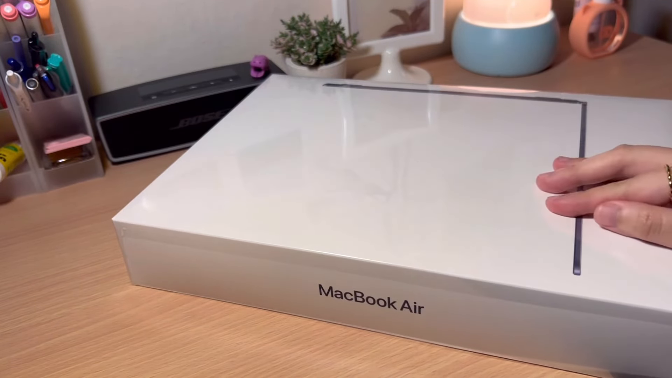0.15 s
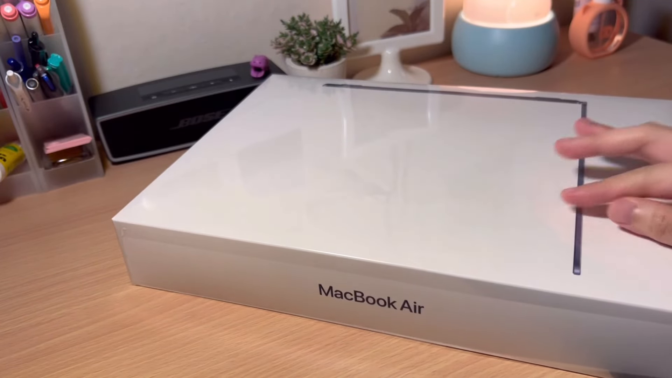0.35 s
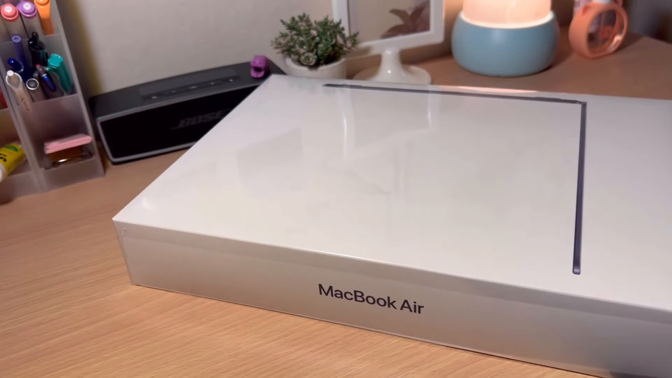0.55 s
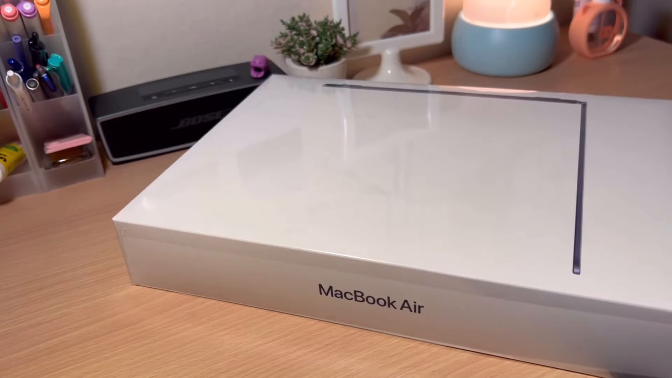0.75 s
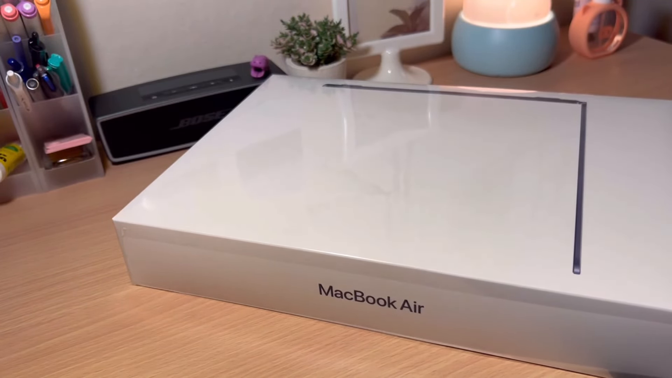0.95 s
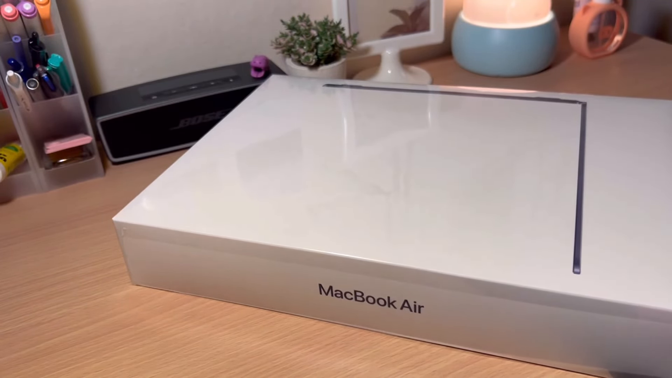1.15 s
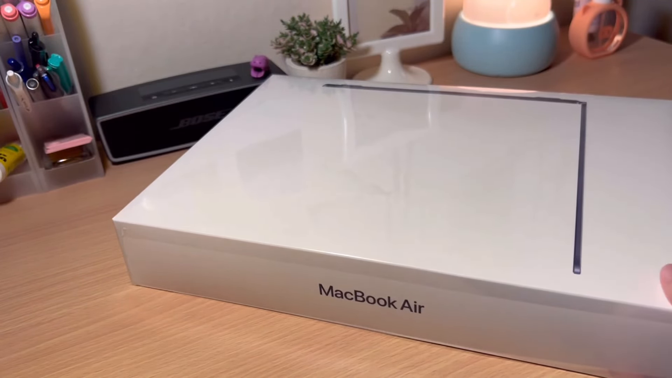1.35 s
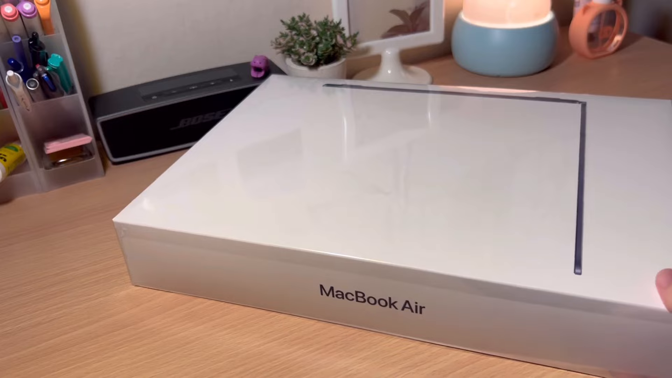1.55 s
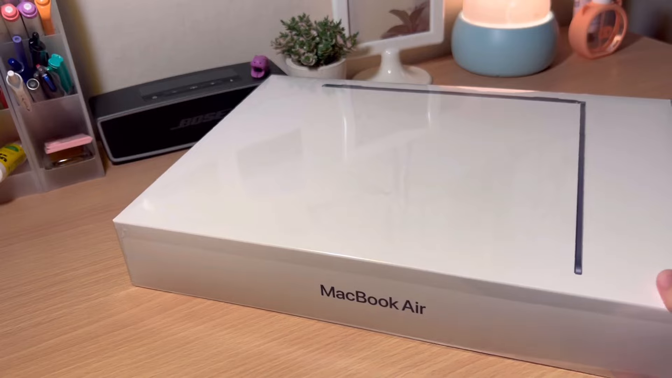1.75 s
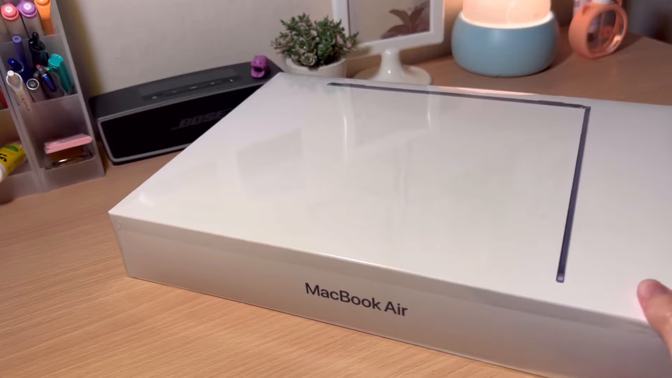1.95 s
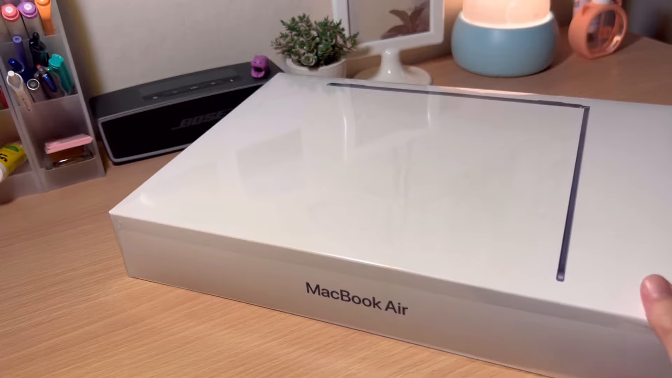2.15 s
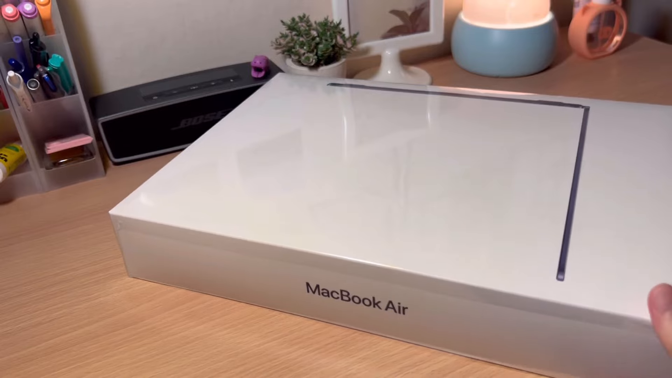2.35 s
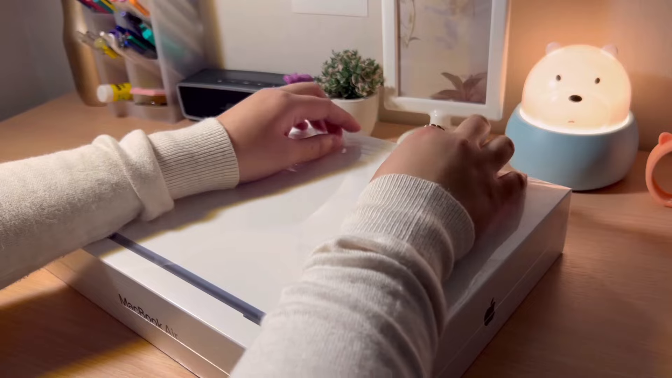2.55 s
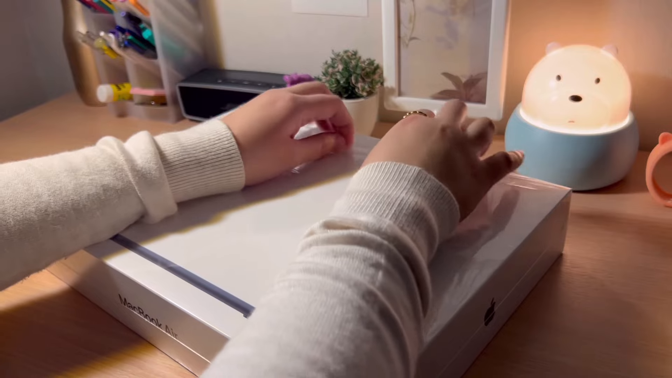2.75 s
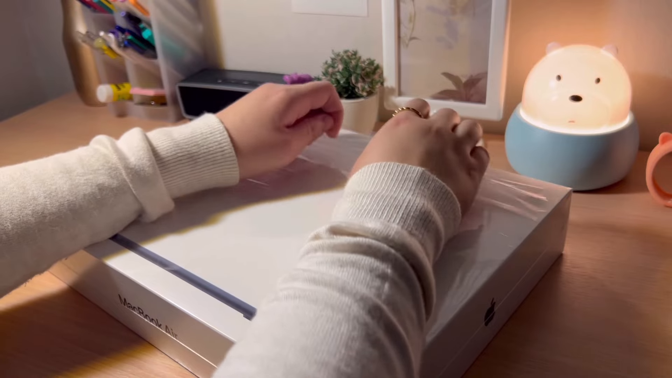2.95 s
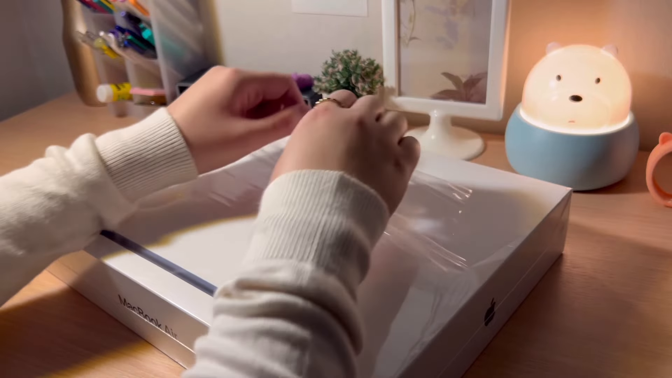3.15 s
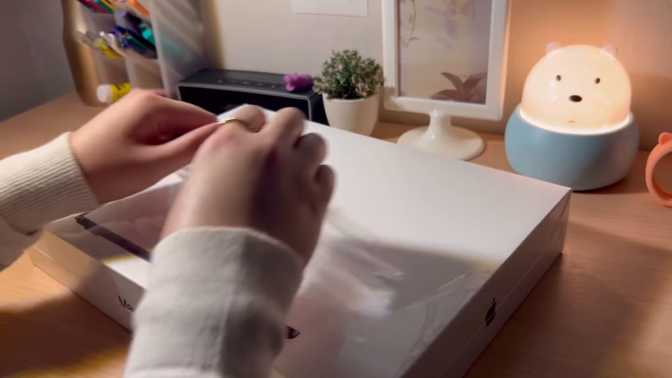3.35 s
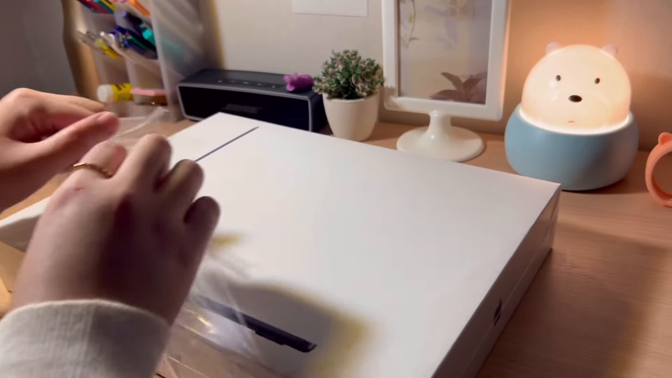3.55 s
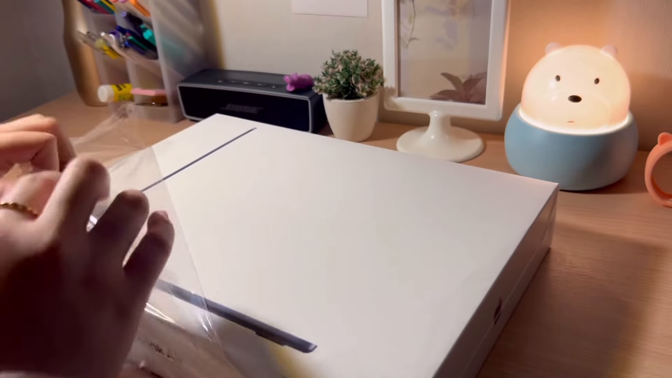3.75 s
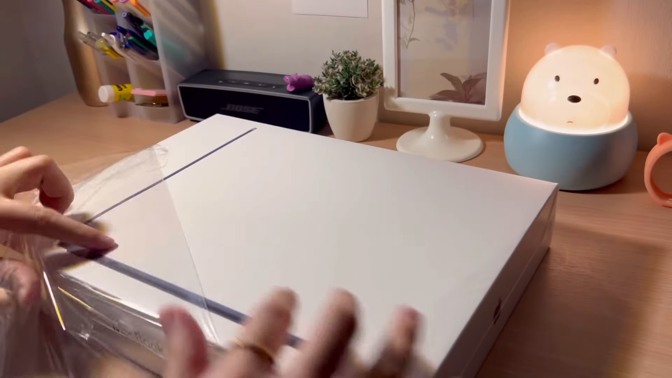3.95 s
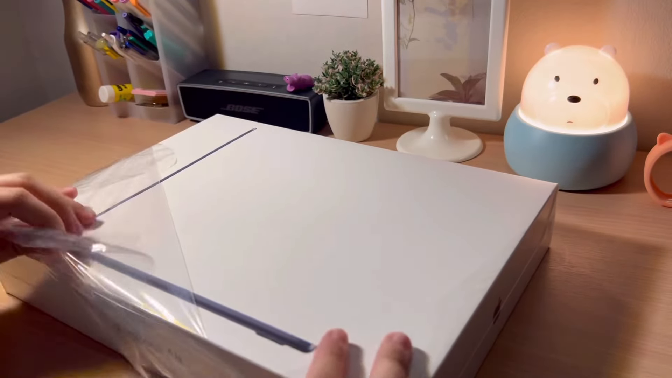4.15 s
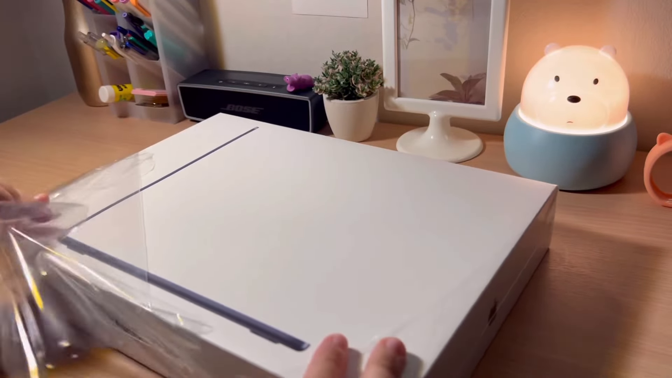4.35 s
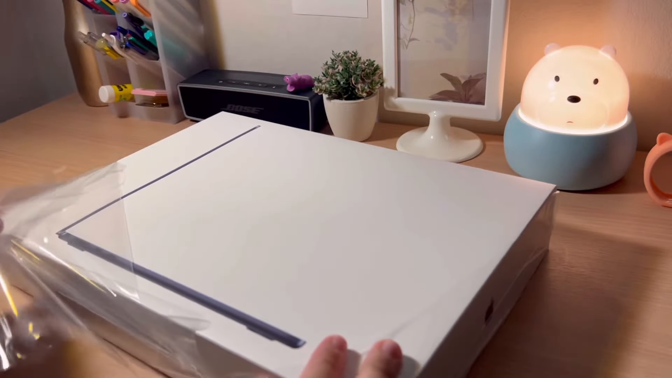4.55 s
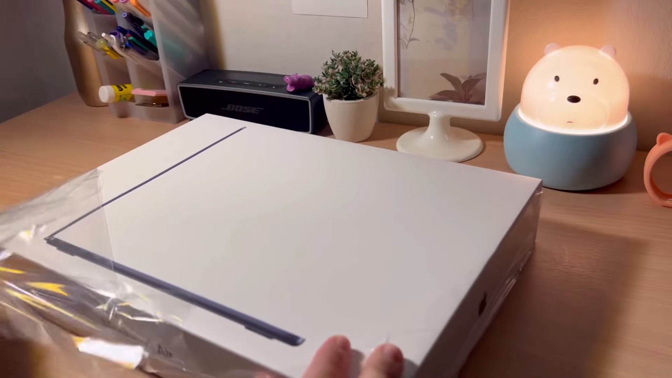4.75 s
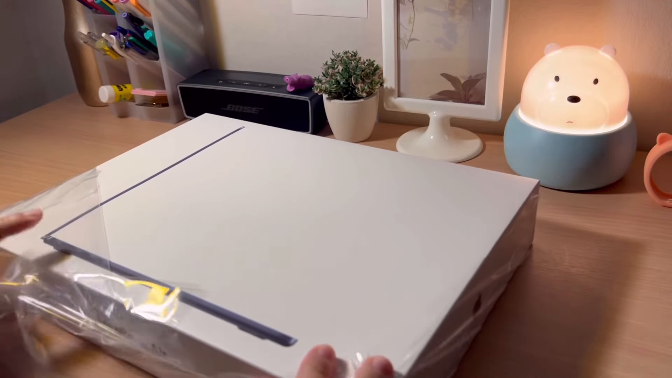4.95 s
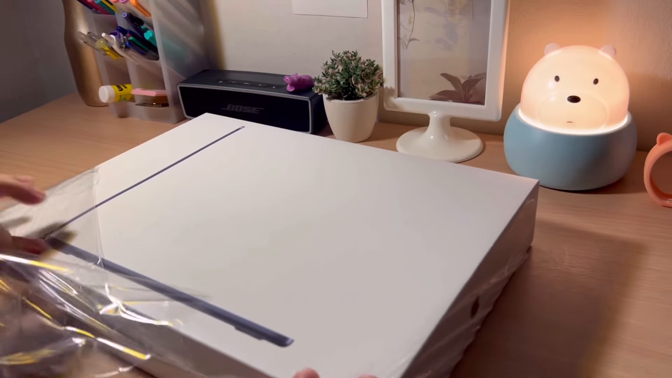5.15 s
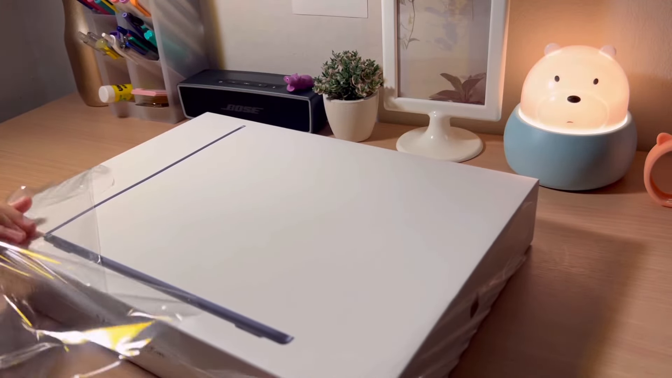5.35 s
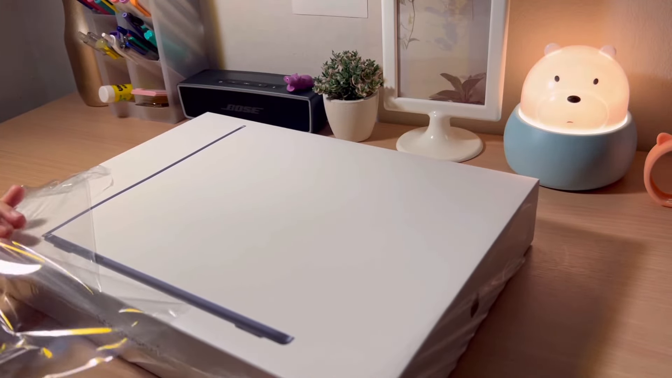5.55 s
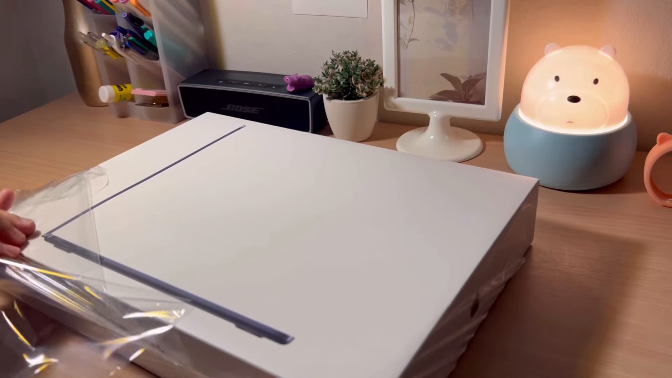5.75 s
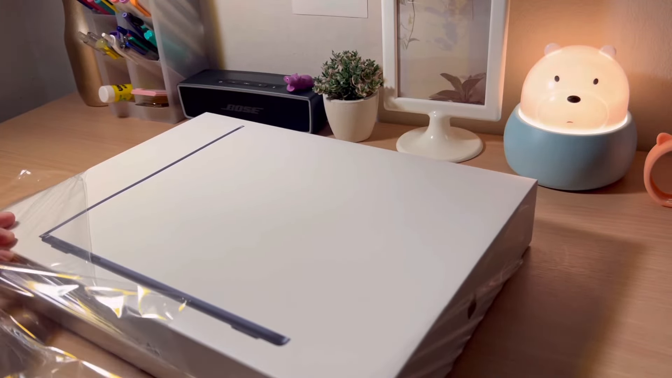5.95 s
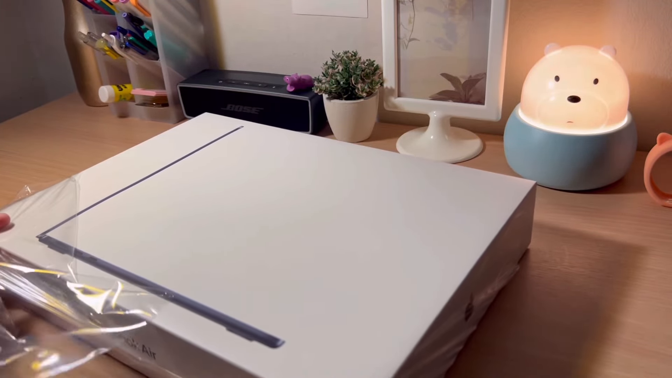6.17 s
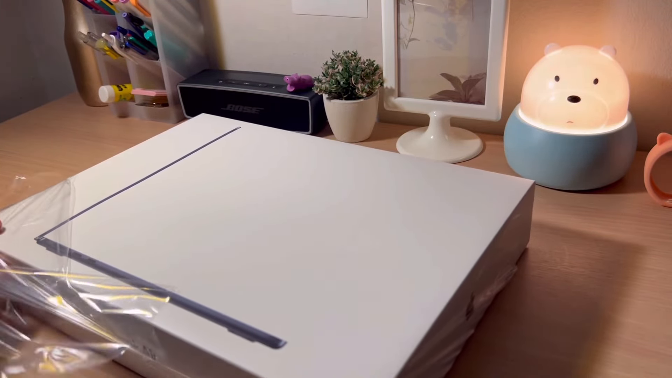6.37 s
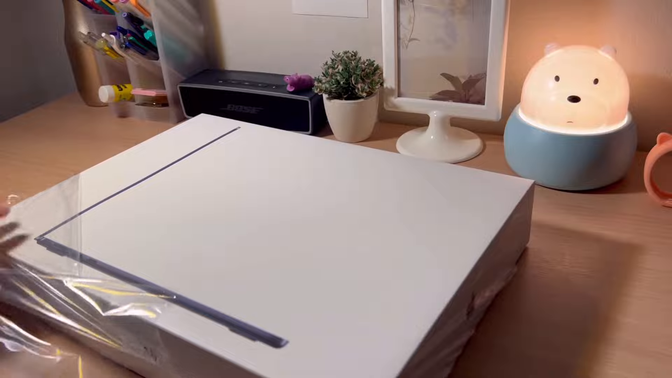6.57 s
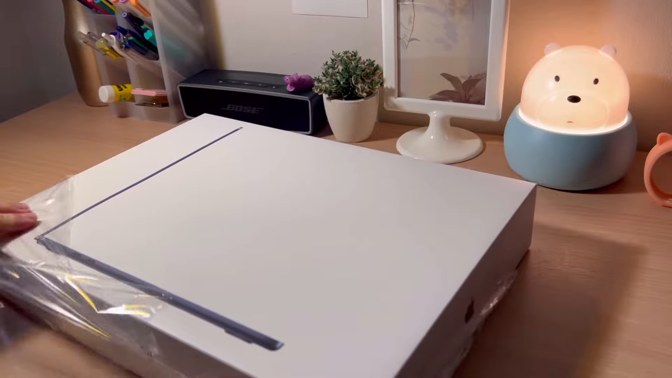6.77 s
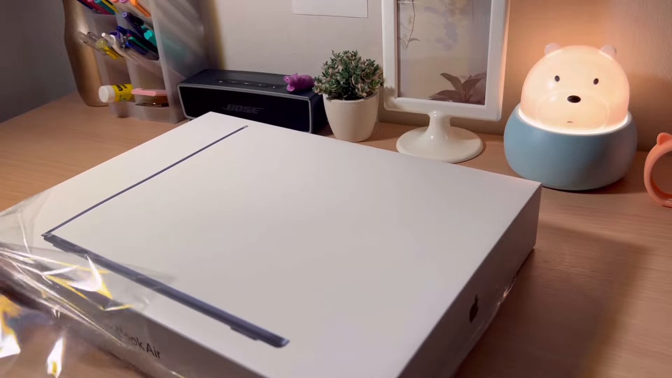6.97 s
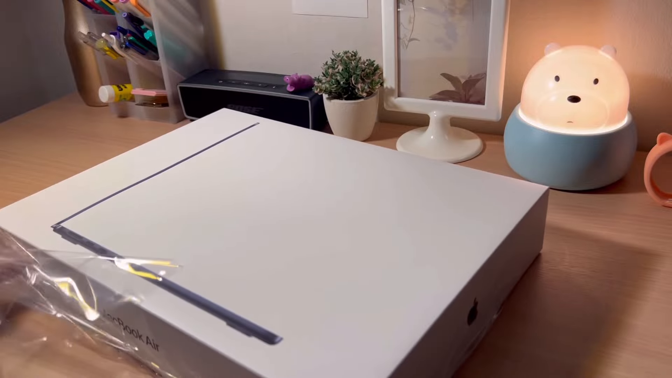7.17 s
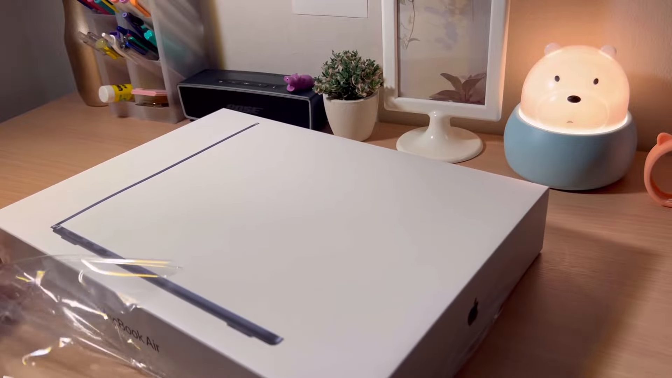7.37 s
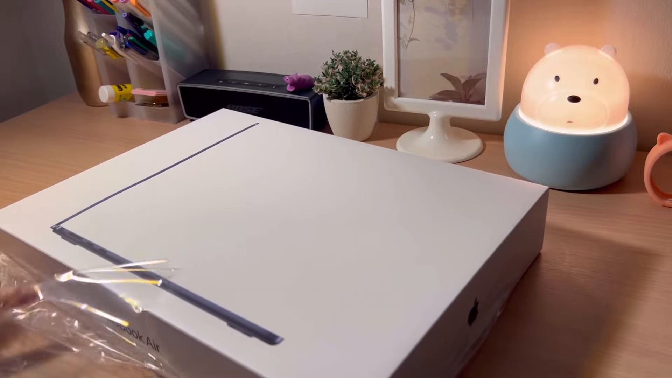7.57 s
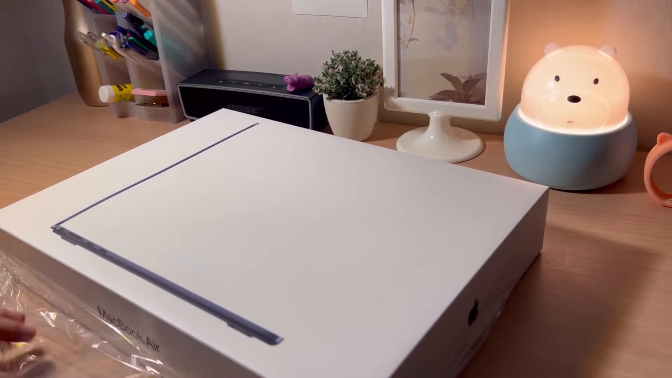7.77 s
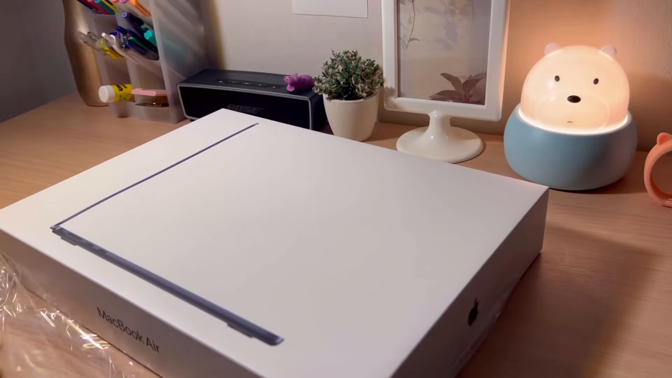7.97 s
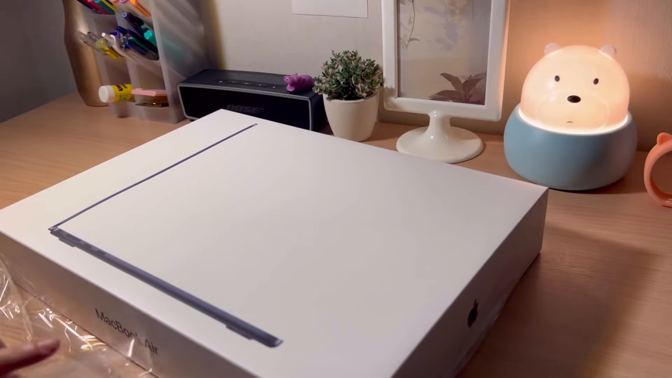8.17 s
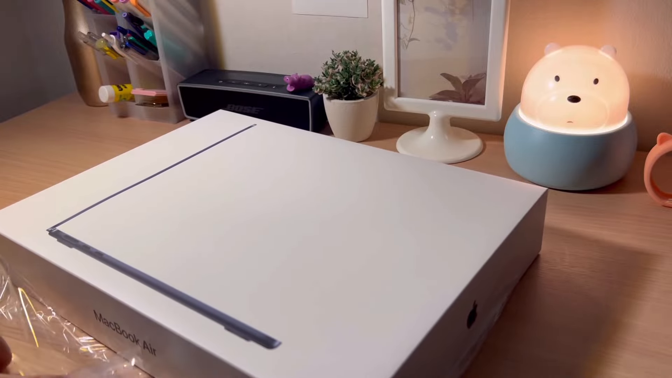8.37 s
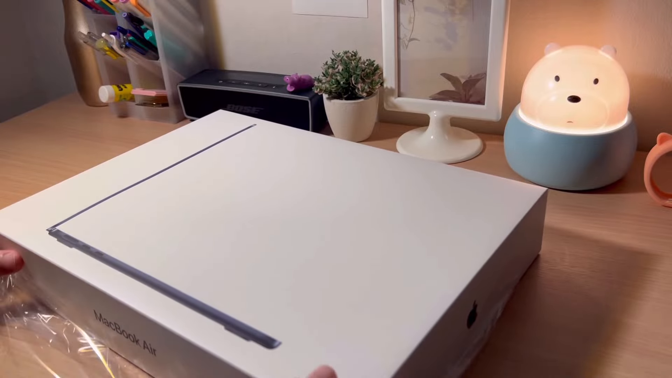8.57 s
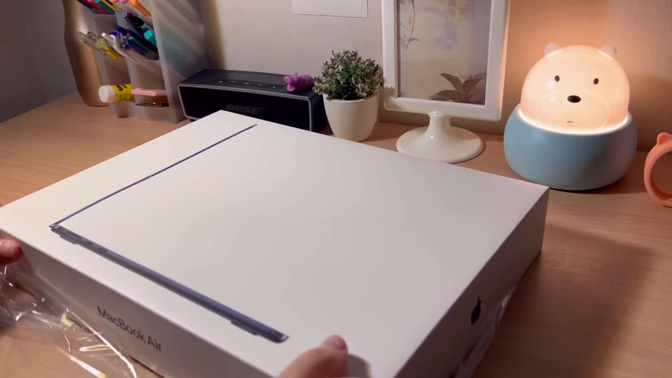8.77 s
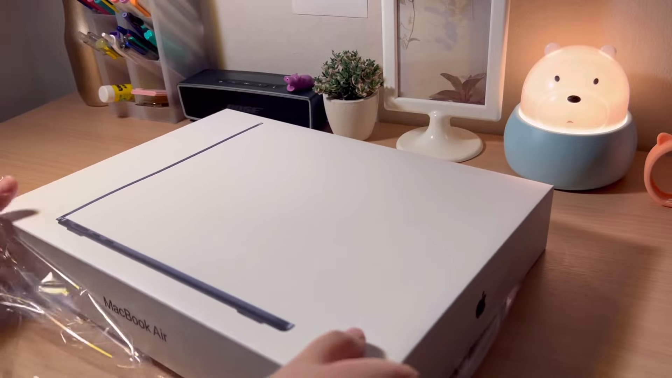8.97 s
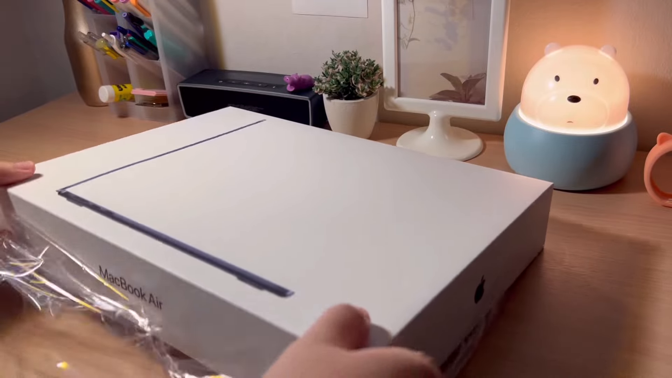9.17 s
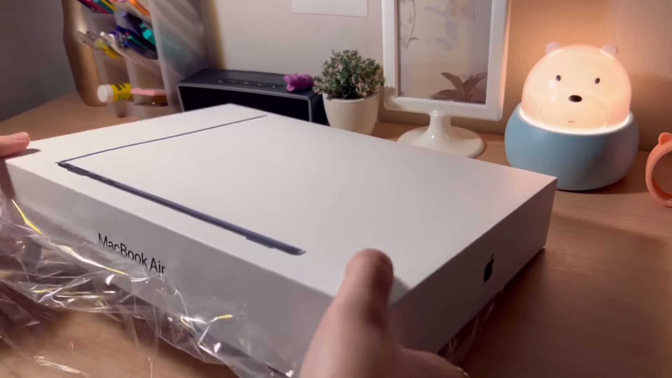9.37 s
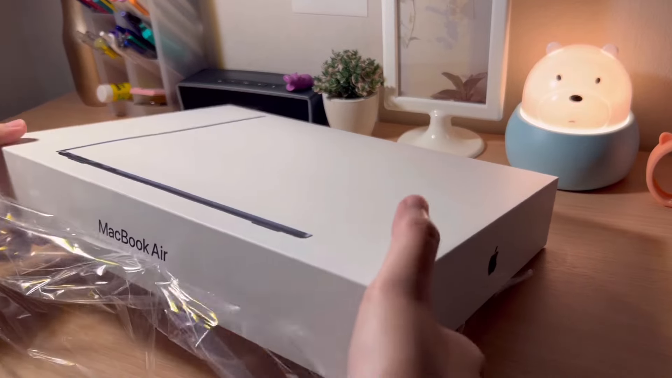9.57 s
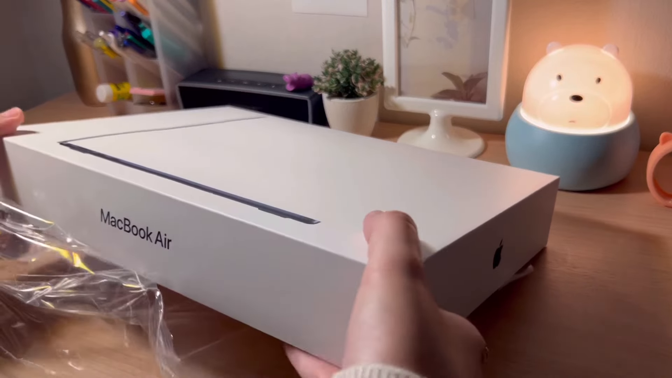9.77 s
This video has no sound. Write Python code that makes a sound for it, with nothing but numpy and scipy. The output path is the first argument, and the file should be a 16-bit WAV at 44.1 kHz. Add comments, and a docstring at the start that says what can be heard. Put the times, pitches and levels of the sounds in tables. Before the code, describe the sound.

Close stereo sound in a small room with quiet air and a faint low hum that grows slightly after 2 seconds. At first there is almost nothing, then small crackles and light finger contact at 0.7 and 1.1 seconds. A sharp, bright snap with a box knock hits at 1.85. From 2.5 a finger hisses over the film and pulling begins, with a cluster of hollow cardboard knocks and snaps around 2.8 to 3.3. Continuous crinkling follows in surges, with a crisp crack at 4.2, a swell near 5, and brief dips as hands regrip. A short low drag drone comes around 6.3 to 6.6, then the densest crackling, with loud snaps and thumps near 7. Crumpling continues, thins around 8.4, and surges again at 9.1 with several low box thumps. It fades to light crackles, with a final soft thump at 9.8.

```python
"""Shrink wrap pulled off a box

Two hands pull shrink wrap off a cardboard box on a desk and crumple it, close to a stereo microphone.
Creases in the plastic film buckle by the thousand as short noise bursts, and larger folds snap.
Blows make the box ring and thump, fingers rub and slide, and the desk carries a low rumble.
Faint whistles, quiet air and a hum that grows louder lie underneath; close sounds echo in a small room."""
import sys
import numpy as np
from scipy import signal
from scipy.fft import rfft, irfft
from scipy.io import wavfile
from scipy.ndimage import uniform_filter1d

SR = 44100
rng = np.random.default_rng(int(sys.argv[2]) if len(sys.argv) > 2 else 0)


def master_out(mix):
    """Clip the mix to full scale and print it as 16-bit PCM to the path in sys.argv[1]."""
    frames = np.transpose(np.atleast_2d(mix))
    ceiling = np.clip(frames, -1, 1)
    pcm = np.round(ceiling * 32767).astype(np.int16)
    wavfile.write(sys.argv[1], SR, pcm)


N = 433062  # length of the scene in samples

# how hard the box is handled: time_s, level_db
HANDLING_CURVE = [(0, -56), (0.16, -77), (0.7, -61.5), (1.25, -71), (1.85, -60.5), (2.5, -67.5),
                  (3.05, -53.5), (3.45, -60.5), (4.05, -55), (4.75, -60.5), (5.1, -55), (6.7, -58.5),
                  (7.05, -56.5), (7.25, -59.5), (7.85, -53), (8.2, -57), (8.75, -61.5), (9.2, -56),
                  (9.55, -60)]
# the steady pull on the wrap: time_s, effort_db
PULL_CURVE = [(0, -100), (2.2, -88.5), (2.55, -64), (3.0, -53.5), (3.72, -54.5), (4.0, -53.5),
              (4.75, -52.5), (5.1, -45), (5.6, -56.5), (6.25, -52.5), (6.9, -44), (7.85, -46.5),
              (8.0, -51.5), (8.55, -58.5), (8.75, -50), (9.1, -44.5), (9.4, -53.5), (9.7, -59.5)]


def gain_of(db):
    """Turns decibels into an amplitude factor."""
    return 10 ** (np.asarray(db) / 20)


def evened(x):
    """Scales a sound to an average strength (rms) of 1."""
    return x / np.sqrt(np.mean(x ** 2) + 1e-20)


def read(points, hz):
    """Reads a table of (pitch, value) at any pitch, in straight lines over log frequency."""
    f, value = np.transpose(points)
    return np.interp(np.log(hz + 1), np.log(np.abs(f) + 1), value)


def level(table):
    """Turns a table of (time, dB) into a gain for every sample."""
    return gain_of(np.interp(np.arange(N) / SR, *np.transpose(table)))


def add(mix, s, sound):
    """Mixes a sound into a stereo signal from time s (in seconds)."""
    part = mix[:, max(round(s * SR), 0):][:, :sound.shape[1]]
    part += sound[:, :part.shape[1]]


def colour(x, points, size=2048):
    """Filters to a spectrum of (pitch, dB) without pre-ringing, so that clicks keep their sharp front."""
    log_gain = np.log(gain_of(read(points, abs(np.fft.fftfreq(size, 1 / SR)))))
    minimum_phase = np.exp(np.conj(signal.hilbert(log_gain)))
    taps = np.fft.ifft(minimum_phase).real[:size // 2]
    taps = taps / np.linalg.norm(taps)  # unit energy
    return signal.oaconvolve(x, taps[None], axes=1)[:, :x.shape[1]]


def pair(x):
    """Turns two unrelated signals into a microphone pair: alike in the bass, less so higher up."""
    # how alike left and right are: pitch_hz, likeness (0 to 1)
    likeness = [(60, 0.96), (140, 0.86), (250, 0.75), (500, 0.45), (1000, 0.18), (4000, 0.35),
                (12000, 0.12)]
    z = rfft(x)
    same = np.clip(read(likeness, np.fft.rfftfreq(x.shape[1], 1 / SR)), -1, 1)
    right = same * z[0] + np.sqrt(1 - same ** 2) * z[1]
    return irfft(np.array([z[0], right]), x.shape[1])


def noise(points):
    """Makes steady stereo noise of rms 1 with a given spectrum."""
    z = rfft(rng.standard_normal((2, N)))
    z = z * gain_of(read(points, np.fft.rfftfreq(N, 1 / SR)))
    return evened(pair(irfft(z, N)))


def ring(x, hz, q):
    """Resonates at one pitch; a higher q rings longer and purer."""
    peak = signal.iirpeak(np.clip(hz, 50, SR / 2.5), max(q, 1), SR)
    return signal.lfilter(*peak, x)


def background():
    """Quiet room air with a slightly fuzzy hum: a pure tone plus narrow noise near its pitch."""
    # air noise: pitch_hz, level_db (per Hz)
    air_spectrum = [(25, -14), (50, 7.5), (140, -0.5), (190, 0), (260, -6), (300, -9), (450, -15),
                    (1000, -26), (2000, -26.5), (4000, -35), (7000, -33.5), (16000, -59)]
    t = np.arange(N) / SR
    tone = np.sqrt(2) * np.sin(2 * np.pi * 239.7 * t)
    fuzz = evened(ring(ring(noise(air_spectrum), 237, 8.1), 252.0, 6.7))
    hum_swell = gain_of(np.interp(t, [2.2, 3.5], [-68, -62]))  # the hum grows by 6 dB
    return gain_of(-65.5) * noise(air_spectrum) + (tone + 0.29 * fuzz) * hum_swell


def rumble():
    """The desk carries the handling as low noise and drones at one pitch when the box is dragged."""
    # desk rumble: pitch_hz, level_db (per Hz)
    rumble_spectrum = [(20, -49), (35, -3.5), (48, -11.5), (63, 6), (90, 0), (115, -7), (140, 2.5),
                       (185, -12), (240, -6), (320, -20), (800, -68)]
    # the box judders as it is dragged over the desk, silent outside these times: time_s, level_db
    drag_curve = [(6.1, -59), (6.28, -60), (6.52, -51.5), (6.6, -50)]
    drone = evened(ring(ring(noise(rumble_spectrum), 131, 9.0), 131, 9.0))
    drag_db = np.interp(np.arange(N) / SR, *np.transpose(drag_curve), left=-np.inf, right=-np.inf)
    return gain_of(0.5) * noise(rumble_spectrum) * level(HANDLING_CURVE) + drone * gain_of(drag_db)


def whistles():
    """A very faint, thin, wavering whistle whose pitch arches: a sine that swells and fades."""
    # faint whistles: start_s, length_s, top_pitch_hz (before the waver), level_db
    whistle_list = [(0.0, 0.11, 5600, -86), (1.7, 0.11, 5600, -85)]
    out = np.zeros((2, N))
    for s, length_s, hz, db in whistle_list:
        arch = np.sin(np.pi * np.linspace(0, 1, round(length_s * SR)))
        waver = evened(uniform_filter1d(rng.standard_normal(len(arch)), size=60))
        pitch_hz = hz * (1 + 0.06 * (arch - 1) + 0.012 * waver)
        turns = np.cumsum(pitch_hz) / SR
        whistle = gain_of(db) * arch * np.sin(2 * np.pi * turns)
        add(out, s, whistle[None])
    return out


def squeezing():
    """Fine and broad film activity: each squeeze rises, holds and dies away on top of the steady pull."""
    # flexing of broad folds under the steady pull: time_s, level_db (relative to the fine crinkle)
    fold_curve = [(2.45, -7), (2.85, -7.5), (8.4, -5.5), (8.75, -8), (9.15, -6)]
    # tugs and squeezes of the fingers: start_s, hold_s, fine_crinkle_db, broad_folds_db
    # (hold_s counts from the start; the levels come before the mix in wrap)
    squeeze_list = [(0.336, 0.005, -65.5, -68), (0.629, 0.1, -63, -73.5), (0.715, 0.036, -57, -60),
                    (0.787, .012, -57.5, -63), (0.883, 0.044, -71, -78), (1.038, 0.14, -59, -63.5),
                    (1.067, 0.05, -48.5, -70), (1.339, 0.046, -84, -72.5), (1.386, 0.0065, -70, -64),
                    (1.408, .005, -69.5, -73), (1.553, 0.34, -99, -84), (1.658, .006, -75, -90),
                    (1.82, 0.034, -54, -47), (1.846, 0.047, -39.5, -60), (2.122, 0.012, -65.5, -72),
                    (2.219, .006, -65, -79), (2.267, 0.069, -61.5, -71), (2.384, 0.025, -66.5, -86),
                    (2.51, 0.11, -73, -70), (2.66, 0.029, -55, -56), (2.835, 0.26, -60, -53),
                    (3.211, 0.12, -52, -55), (3.576, 0.034, -50.5, -57), (3.785, 0.058, -52, -54.5),
                    (3.963, 0.077, -52.5, -57.5), (4.186, 0.069, -44.5, -50), (4.324, 0.023, -50, -51),
                    (4.627, 0.028, -48.5, -74), (4.826, 0.12, -42, -55.5), (5.28, 0.19, -58.5, -57),
                    (5.31, 0.04, -53.5, -58), (5.688, 0.039, -51, -61), (5.891, 0.13, -53.5, -56.5),
                    (6.122, 0.038, -48, -49.5), (6.352, 0.13, -42.5, -48), (6.502, 0.036, -43, -48.5),
                    (6.738, 0.16, -42.5, -61), (6.974, 0.061, -39, -48.5), (7.214, 0.12, -45.5, -49),
                    (7.374, 0.4, -46, -59.5), (7.815, 0.12, -48, -61.5), (8.106, 0.018, -52, -52),
                    (8.28, .02, -64, -63), (8.589, 0.023, -47.5, -54.5), (8.68, 0.18, -51.5, -72),
                    (8.863, 0.071, -45, -56.5), (9.124, 0.14, -39.5, -47), (9.249, 0.11, -51, -52.5),
                    (9.405, 0.0074, -53, -57), (9.491, 0.039, -53, -53), (9.567, 0.0056, -57, -58),
                    (9.7, 0.0041, -71, -56), (9.775, 0.056, -52, -53)]
    attack_s, release_s = 0.006, 0.021  # the fingers close quickly; the film settles after them
    power = np.array([level(PULL_CURVE), level(PULL_CURVE) * level(fold_curve)]) ** 2
    t = np.arange(SR) / SR
    for s, hold_s, fine_db, folds_db in squeeze_list:
        shape = np.minimum(t / attack_s, 1) * np.exp(-np.maximum(t - hold_s, 0) / release_s)
        add(power, s, (shape * gain_of([[fine_db], [folds_db]])) ** 2)
    return np.sqrt(power)


def grip():
    """Gain of the crinkling and rubbing: it dips smoothly as the hands ease off for a new grip."""
    # new grips: time_s, drop_db
    regrip_list = [(2.81, 3), (3.755, 10), (4.768, 0.5), (5.57, 7), (5.85, 0), (6.28, 7), (6.7, 3.5),
                   (7.36, 4.5), (8.57, 6)]
    half_length_s = 0.017
    t = np.arange(N) / SR
    drop = sum(drop_db * np.exp(-((t - s) / half_length_s) ** 2) for s, drop_db in regrip_list)
    return gain_of(-drop)


def buckle(ms, lag_ms, flutter_db=-17, flutter_s=0.007, size=900):
    """Loudness of a flipping crease at each ear: a burst peaking after ms / 2, then a fluttering sheet."""
    ear_delay_s = np.maximum([[lag_ms], [-lag_ms]], 0) / 1000
    t = np.maximum(np.arange(size) / SR - ear_delay_s, 0)
    u = t / (max(ms, 0.1) / 1000 / 2)
    flutter = gain_of(flutter_db) * np.exp(-t / flutter_s) * (1 - np.exp(-u))
    return u * np.exp(1 - u) + flutter


def creases(per_s, spread_db, clump_db, ms, low_hz, high_hz, q, broad, spectrum, count=12):
    """Avalanches of buckling creases, many small and a few large, in patches of their own pitch and side."""
    # random crease sizes that swell in clumps
    clumps = uniform_filter1d(uniform_filter1d(rng.standard_normal(N), size=600), size=250)
    size_db = spread_db * np.minimum(rng.exponential(1, N), 4.5) + clump_db * evened(clumps)
    energy = gain_of(size_db) ** 2 * (rng.random(N) < per_s / SR)
    energy /= np.abs(uniform_filter1d(energy, size=3000)) + 1e-9  # even loudness; the hands set it later

    # creases set off their neighbours: runs of about 7 ms in which 55% stay in one patch
    patch = rng.integers(0, count, N)
    run = np.cumsum(rng.random(N) < 1 / (0.007 * SR))
    patch = np.where(rng.random(N) < 0.55, patch[run], patch)

    fizz = pair(rng.standard_normal((2, N)))
    out = np.zeros((2, N))
    for k, hz in enumerate(np.geomspace(low_hz, high_hz, count)):
        shape = buckle(ms * rng.uniform(0.61, 1.4), rng.uniform(-0.18, 0.24))
        power = np.abs(signal.oaconvolve((energy * (patch == k))[None], shape ** 2, axes=1)[:, :N])
        bursts = np.sqrt(power / np.sum(shape ** 2)) * np.roll(fizz, rng.integers(N), axis=1)
        side_gain = gain_of(1.46 * (-1) ** k * np.array([[1], [-1]]))  # patches lean left and right in turn
        out += (ring(bursts, hz, q) + broad * bursts) * side_gain
    return evened(colour(out, spectrum))


def wrap(effort, flexing):
    """Fine crinkles fizz, wrinkles crackle and broad folds pop lower; harder squeezes flip more creases."""
    # fine crinkles and wrinkles: pitch_hz, level_db (per Hz)
    crinkle_spectrum = [(1200, -33), (2500, 1.5), (3600, -1.5), (5000, 1), (8000, 2.5), (15500, 1),
                        (17000, -56)]
    # broad folds: pitch_hz, level_db (per Hz)
    flex_spectrum = [(250, -10), (500, -10.5), (760, 0), (950, 4), (1300, 3.5), (2200, 3.5), (3200, -5.5),
                     (5000, -1), (9000, -46)]
    pace = np.clip(effort / gain_of(-46.5), 0.3, 3) ** 0.7
    fine = creases(per_s=1000 * pace, spread_db=3.2, clump_db=3, ms=0.26, low_hz=3100, high_hz=15500,
                   q=3, broad=0.35, spectrum=crinkle_spectrum)
    wrinkles = creases(per_s=90 * pace, spread_db=1.8, clump_db=1.5, ms=0.7, low_hz=2000, high_hz=12000,
                       q=1.6, broad=0.5, spectrum=crinkle_spectrum, count=7)
    folds = creases(per_s=380 * pace, spread_db=0.6, clump_db=1.5, ms=1.2, low_hz=577, high_hz=3840,
                    q=2.8, broad=0.27, spectrum=flex_spectrum)
    return (gain_of(-2) * fine + gain_of(-7) * wrinkles) * effort + gain_of(-3.0) * folds * flexing


def struck(modes, contact_s, size=14000):
    """Fading tones after a soft blow; each blow lands on another spot, so pitches and levels vary."""
    t = np.arange(size) / SR
    out = np.zeros((2, size))
    for hz, db, t60 in modes:
        right_detune_hz = hz * rng.normal(0, 0.00021)
        turns = hz * rng.uniform(0.9, 1.04) * t + rng.random() + np.array([[0], [right_detune_hz]])
        out += gain_of(db + rng.normal(0, 1.1) - 60 * t / t60) * np.sin(2 * np.pi * turns)
    out *= 1 - np.exp(-(t / contact_s) ** 2)  # soft start
    return out / np.sqrt(np.mean(out[:, :SR // 40] ** 2))  # rms 1 over the first 25 ms


def box(flexing):
    """Each knock rings the cardboard and thumps the box on the desk; fingers and flexing film rub it."""
    # blows: time_s, thud_db, thud_pitch_hz, cardboard_ring_db, softness_db (lost per octave above the thud)
    knock_list = [(0.731, -61, 112, -54, 0), (1.4, -50.5, 138, -71, 9), (1.439, -58, 145, -76, 4),
                  (1.577, -73, 135, -61, 5), (1.813, -64, 152, -49.5, -3), (1.85, -48, 143, -42, 1),
                  (2.384, -56.5, 134, -75, 0), (2.799, -53, 70, -69, 6), (2.867, -70, 83, -47, -2),
                  (2.927, -52, 87.5, -40, -2.5), (2.998, -58, 137, -52, 3), (3.048, -49, 84, -48, -3),
                  (3.095, -64, 70.5, -52.5, -3), (3.224, -59, 83, -47.5, -6.5),
                  (3.268, -66, 139, -43.5, 1.5), (4.078, -52, 70.6, -64, -6), (4.62, -53.5, 141, -54, 6),
                  (5.011, -58, 74, -55.5, 12), (5.084, -54, 130, -51, -5), (6.615, -60, 167, -47.5, -1),
                  (6.879, -53, 140, -50, -6), (6.981, -45.5, 157, -43, -5.5), (7.03, -45.5, 67.6, -42, 14),
                  (7.098, -51, 65, -72, 8), (9.146, -46, 145, -44, 10), (9.201, -48, 112, -44, -0.5),
                  (9.258, -53, 69, -44.5, 8), (9.292, -52.5, 63.4, -66, 7), (9.369, -48.5, 77, -78, 6),
                  (9.665, -49.5, 141, -47, 10), (9.802, -44.5, 99, -58, 6)]
    # tones of the cardboard panels, varied at each blow: pitch_hz, level_db, fade_s (to fall by 60 dB)
    box_modes = [(225.4, 3.5, 0.051), (302.6, -2.5, 0.087), (327.5, -0.5, 0.051), (389, 0, 0.045),
                 (445, 2.5, 0.039), (533, -5.5, 0.049), (589, -1, 0.047), (840, -13, 0.028),
                 (945, -1.5, 0.041), (1330, -5.5, 0.04), (1647, -11.5, 0.068), (2170, -12.5, .06)]
    # rubbing: pitch_hz, level_db (per Hz)
    rub_spectrum = [(100, -25.5), (220, 1.5), (330, -2.5), (500, -1), (750, -8), (1500, -9), (4000, -45.5)]
    knocks = np.zeros((2, N))
    for s, thud_db, thud_hz, ring_db, softness in knock_list:
        panels = [(hz, db - softness * np.log2(hz / thud_hz), t60) for hz, db, t60 in box_modes]
        thud = struck([(thud_hz, 0, 0.2)], contact_s=0.0019)
        add(knocks, s, gain_of(thud_db) * thud + gain_of(ring_db) * struck(panels, contact_s=0.0019))

    rub = creases(per_s=500, spread_db=2.5, clump_db=1, ms=1.51, low_hz=270, high_hz=710,
                  q=2.7, broad=0.18, spectrum=rub_spectrum, count=5)
    firm_db, rub_db, rub_power = -54, -60, 1.92  # rub level at a firm grip; it grows faster than the rumble
    firmness = level(HANDLING_CURVE) / gain_of(firm_db)
    rubbing = np.arange(N) / SR > 0.46  # the rubbing of the fingers is heard only after 0.46 s
    fingers = gain_of(rub_db) * grip() * firmness ** rub_power * rubbing
    scrape = gain_of(-7.5) * flexing  # the flexing film scrapes the cardboard too
    return knocks + rub * np.hypot(fingers, scrape)


def slides():
    """A finger on taut film gives a bright, grainy hiss that swells and fades with its speed."""
    # slides of a finger: start_s, length_s, level_db (at the top of the swell)
    slide_list = [(0.696, 0.11, -70), (1.05, 0.12, -64), (2.46, .22, -58)]
    # their hiss: pitch_hz, level_db (per Hz)
    slide_spectrum = [(2500, -30), (4500, -16), (8000, 0), (12000, -2), (15800, 2), (17000, -39)]
    speed = np.zeros((2, N))
    for s, length_s, db in slide_list:
        swell = np.sin(np.pi * np.linspace(0, 1, round(length_s * SR)))
        add(speed, s, gain_of(db) * swell[None])
    grain = gain_of(3.1 * evened(uniform_filter1d(rng.standard_normal(N), size=120)))
    return speed * evened(noise(slide_spectrum) * grain)


def swing(hz, size):
    """A released patch of film swings a few times, its pitch falling as it slackens."""
    cycles = np.arange(size) / SR * hz
    sag = 0.42 * (2 * np.exp(-cycles / 2.5) - 1.5)  # from 21% above hz towards 63% below
    turns = np.cumsum(hz * (1 + sag)) / SR
    u = cycles / 0.75  # widest after 0.75 cycles of hz
    return u * np.exp(1 - u) * np.sin(2 * np.pi * (turns + rng.random() + rng.normal(0, 0.19, (2, 1))))


def snap(s, tick_db, crack_db, crack_hz, pop_db, pop_hz, ms, size=150):
    """A taut fold gives way: a bright tick, a pitched crack and the pop of the freed patch."""
    # tick: pitch_hz, level_db (per Hz)
    tick_spectrum = [(2500, -28), (6000, -5), (9000, -1), (15900, -2), (17000, -50)]
    # crack: multiple (of the crack's pitch), level_db (per Hz)
    crack_spectrum = [(.3, -28), (.62, -8), (.85, 1), (1.2, 0.5), (1.6, -15), (2.5, -29)]
    # rustle of the pop: multiple (of the pop's pitch), level_db (per Hz)
    pop_spectrum = [(.1, -33.5), (.3, 4), (.6, -7), (.88, -4.5), (1.18, 1.5), (1.5, -3), (2, -5), (5, -34)]
    # the hands start at the right, then move to the middle: time_s, left_ear_lag_ms
    hand_lag = [(1.8, 0.15), (2.5, 0.0068)]

    # a short, soft noise swells into each snap
    lead_in = gain_of(-15.5) * np.exp(np.arange(-size, 0) / SR / 0.0027)
    shape = np.hstack([[lead_in, lead_in], buckle(ms, np.interp(s, *np.transpose(hand_lag)))])
    high, middle, low = (evened(shape * pair(rng.choice([-1., 1.], shape.shape))) for _ in range(3))
    # the patch turns inside out in one jump
    flip = evened(1. * (shape == shape.max(1, keepdims=True)))

    tick = colour(high + 0.15 * flip, tick_spectrum)
    crack = colour(middle, [(crack_hz * multiple, db) for multiple, db in crack_spectrum])
    tone = np.pad(swing(pop_hz, shape.shape[1] - size), ((0, 0), (size, 0)))
    rustle = colour(low, [(pop_hz * multiple, db) for multiple, db in pop_spectrum])
    pop = evened(tone) + gain_of(-5) * evened(rustle)
    sound = gain_of(tick_db) * evened(tick) + gain_of(crack_db) * evened(crack)
    return s - size / SR, sound + gain_of(pop_db) * evened(pop)


def snaps(count=10):
    """The loud snaps, and lesser ones scattered at random whose strength follows the pull."""
    # loud snaps of the film: time_s, tick_db, crack_db, crack_pitch_hz, pop_db, pop_pitch_hz, length_ms
    # (levels before the 9 dB cut of all snaps below)
    snap_list = [(0.734, -44.5, -38, 4100, -50, 1030, 0.97), (0.7555, -47, -59, 5500, -57, 1710, 2),
                 (1.0462, -53, -73, 2900.0, -73, 800.0, 1.3), (1.0737, -51, -50, 5000, -64, 1000, 1.7),
                 (1.1047, -39, -62, 3640.0, -61, 1750.0, 2.7),
                 (1.134, -41.5, -51, 6170.0, -71, 1520.0, 1.8), (1.1635, -54.0, -49.5, 2700, -49, 905, 1.6),
                 (1.814, -36.5, -48, 2900, -39, 1060.0, 3.4), (1.849, -20, -32, 6250, -27.5, 1800, 1.9),
                 (1.86, -30, -42, 5310.0, -27.5, 1660, 2.3), (2.125, -78, -55, 9000.0, -80, 1240, 0.92),
                 (2.273, -49.5, -61, 5500, -70, 2200, 1), (2.2995, -41.5, -53, 3730, -64, 1420.0, 1.6),
                 (2.5173, -63, -58, 2880, -49.5, 1370, 2.7), (2.6014, -52, -62, 5000, -60, 2200, 1.2),
                 (2.667, -45, -49, 7740.0, -48, 1750.0, 2.6), (2.7018, -45, -55, 5500, -50, 2000, 1),
                 (2.708, -40.5, -47.5, 4530, -45, 1330, 1.75), (2.7589, -49, -57, 3640.0, -44, 1480, 3.5),
                 (2.8671, -44, -43, 3100, -44, 930, 3.1), (2.902, -56, -57, 3100, -43, 1400, 1.5),
                 (2.9255, -25, -23.5, 12500, -37, 1300, 0.65), (2.932, -48, -38, 3100, -43, 1340, 3),
                 (2.9752, -67, -49, 7180.0, -36.5, 1080, 2.4), (3.049, -55, -50, 4920.0, -39.5, 990, 2.6),
                 (3.0962, -54, -47, 2900.0, -45, 790, 0.75), (3.1259, -48, -48.5, 6730, -47.5, 1860, 2.54),
                 (3.1586, -40, -36, 7300, -36.5, 3300, 1.1), (3.223, -44, -49, 3640.0, -43, 1750.0, 3.5),
                 (3.2305, -42, -50, 4630, -43, 2000, 1.2), (3.2668, -45, -47, 3400, -37, 950, 2.4),
                 (3.2741, -32.5, -39, 3340, -39, 1300, 4.7), (3.464, -36.5, -42, 8450, -50.5, 1630.0, 1.6),
                 (3.534, -57, -49, 7340, -49.5, 2690.0, 2.5), (3.5859, -57, -46.5, 4300, -41.5, 1020, 1.9),
                 (3.642, -40.5, -42.5, 6650.0, -56, 910, 2.7),
                 (3.8506, -37.5, -44, 6170.0, -56, 3100.0, 2.3), (3.9664, -47, -52, 6000, -58, 1800, 1),
                 (4.0161, -44, -49, 4920.0, -54.5, 2890.0, 1), (4.057, -39, -53, 4560.0, -54, 1320.0, 2.5),
                 (4.085, -40, -67, 2900.0, -54, 790, 2.9), (4.1488, -41.5, -54, 6500, -62, 2000, 0.71),
                 (4.1922, -24, -23, 7100, -43, 1610, 0.89), (4.3146, -38.5, -46.0, 5310.0, -49, 915, 2.5),
                 (4.332, -41, -47.0, 6650.0, -60, 2500.0, 2.2), (4.377, -49, -57, 5000, -52.5, 1010, 1.2),
                 (4.4015, -41, -53, 5310.0, -54, 1230.0, 1.2), (4.481, -41, -46, 6600, -67, 2300, 1.6),
                 (4.5246, -37, -47, 7800, -37, 1750, 0.69), (4.616, -39, -36, 8300, -33.5, 2570, 0.75),
                 (4.7123, -40, -56, 7500, -68, 2500, 0.81), (4.765, -46, -32.5, 9200, -85, 3100.0, 1.2),
                 (4.9093, -36, -48, 6650.0, -48, 2020.0, 2.4), (4.9272, -52, -53, 4500, -44, 2440, 1.2),
                 (5.038, -67.5, -53.0, 5310.0, -39.5, 1610, 1.8),
                 (5.0584, -54, -49, 7800, -44, 3100.0, 1.1), (5.081, -35.5, -42, 4600, -41, 1060.0, 3.7),
                 (5.1247, -43, -44.5, 6170.0, -42.5, 2020.0, 1.7), (5.228, -40, -34, 8900, -66, 3080, 1.3),
                 (5.301, -62, -55, 3400, -41, 880, 2), (5.3177, -35, -35, 2450, -32, 2200, 2.4),
                 (5.3943, -37.5, -52, 3370.0, -63.0, 2170.0, 2.1),
                 (5.411, -53.0, -75.5, 2900.0, -46.5, 1320.0, 1.2),
                 (5.4383, -36.5, -54, 2900.0, -42, 925, 3.2), (5.474, -43, -48, 6530, -60, 2500, 0.9),
                 (5.5653, -45, -61, 7000, -67, 2500, 0.7), (5.5933, -59, -53, 5200, -64, 2500, 1),
                 (5.601, -39, -64.5, 4250, -65.5, 2170.0, 2),
                 (5.6177, -37.5, -59.5, 3130.0, -61.0, 1060.0, 1.2),
                 (5.6668, -43.5, -57, 3130.0, -53, 1520.0, 2.3),
                 (5.7728, -71.5, -49, 3640.0, -44, 1400, 1.27), (5.7828, -43, -56, 7500, -67, 2500, 0.81),
                 (5.802, -59, -46, 4840, -47.5, 1880.0, 1.15), (5.9094, -43, -52, 2900.0, -50, 796, 2.4),
                 (5.9323, -42, -44, 5530, -57, 2300, 1.2), (6.061, -42, -49, 5550, -51, 2800, 0.9),
                 (6.108, -40, -52, 7180.0, -56, 1750.0, 1.6), (6.3002, -52, -62, 5000, -50, 1490, 1.2),
                 (6.4422, -38, -34.5, 5300, -32.5, 2170.0, 2.3),
                 (6.515, -35, -43, 5310.0, -42.5, 2890.0, 1.4), (6.6156, -29, -33, 5050, -35.5, 1180, 2.8),
                 (6.774, -35, -53, 6800, -56.0, 800.0, 1.8), (6.8808, -38, -43, 4530, -37.5, 1530, 2.6),
                 (6.9802, -27, -22.5, 7350, -29, 2800, 1.9), (6.989, -43.0, -29.5, 5720.0, -48, 800.0, 1.1),
                 (7.0284, -46, -33, 4400, -39, 1740, 2.4), (7.2108, -36, -44, 4230.0, -53, 2690.0, 1.7),
                 (7.2942, -47, -39, 7100, -45, 2330.0, 1.7), (7.617, -48, -47, 4200, -45, 2400, 1.2),
                 (7.715, -35, -45, 5500, -41, 1410, 1.5), (7.8819, -29, -52, 3130.0, -61, 990.0, 0.86),
                 (7.9114, -33, -46, 6500, -42.5, 2400, 0.9), (8.0896, -38, -43.5, 6700, -57, 2020.0, 1.5),
                 (8.151, -37, -46, 5720.0, -51, 1750.0, 1.2), (8.1695, -37, -39, 8200, -51, 3100.0, 0.86),
                 (8.2265, -41, -43, 5500, -58, 2500, 1), (8.245, -41, -49, 5500, -48, 2400, 1.3),
                 (8.253, -42, -46, 5310.0, -46, 2550, 2.65), (8.3093, -59, -56, 4500, -50, 1500, 1.2),
                 (8.3299, -44, -46, 3100, -47, 1280, 2.2), (8.4073, -41, -50.0, 5800, -53, 2020.0, 2.7),
                 (8.442, -51, -55, 5000, -48.5, 1290, 1.5), (8.525, -47, -65, 5720.0, -56, 1320.0, 2.5),
                 (8.603, -58, -49, 4920.0, -44, 2500.0, 1.6), (9.1995, -32, -30, 5200, -37.5, 1410, 1.8),
                 (9.5915, -49, -54, 4500, -49, 2000, 1.2)]
    out = np.zeros((2, N))
    # one lesser snap in each tenth of the scene
    for k, (when, strength, crack, pop) in enumerate(rng.random((count, 4))):
        s = (k + when) / count * N / SR
        pull_db = min(np.interp(s, *np.transpose(PULL_CURVE)), -47)  # a harder pull makes them no louder
        db = pull_db + 3 * (2 * strength - 1)
        crack_hz, pop_hz = 5200 * 2 ** (crack - 0.5), 1950 * 2 ** (pop - 0.5)
        add(out, *snap(s, db + 2, db + 4, crack_hz, db - 14, pop_hz, ms=1.2))
    for row in snap_list:
        add(out, *snap(*row))
    return gain_of(-9.0) * out


def reflections(wet_db, early_db, size=22000):
    """Desk and wall echoes as a few strong taps over a short tail of sparse taps, faster in the treble."""
    # echo fade: pitch_hz, fade_s (to fall by 60 dB)
    echo_fade = [(150, 0.49), (500, 0.33), (1500, 0.3), (4000, 0.29), (8000, 0.28), (15000, 0.15)]
    taps = rng.choice([-1., 1.], (2, size)) * (rng.random((2, size)) < 0.12)
    hz, t, z = signal.stft(pair(taps), SR, nperseg=256)
    fade = gain_of(-60 * t / read(echo_fade, hz)[:, None])
    tail = signal.istft(z * fade, SR, nperseg=256)[1]
    tail *= np.clip(np.arange(tail.shape[1]) / SR / 0.013, 0, 1) ** 2  # the tail builds up over 13 ms
    tail *= gain_of(wet_db) / np.linalg.norm(tail[0])
    for side in tail:
        early = rng.integers(SR // 600, SR // 90, size=8)  # about 2 to 11 ms after the sound
        side[early] += gain_of(early_db) * rng.choice([-1, 1], size=8)
    return tail


def room(x, wet_db, early_db, count=4):
    """Adds echoes and fades between several sets of them, so no pitch stands out steadily."""
    place = np.arange(N) / SR * 23 % count  # 23 sets per second, in turn
    out = x.copy()
    for k in range(count):
        distance = abs((place - k + count / 2) % count - count / 2)
        share = np.cos(np.pi / 2 * np.minimum(distance, 1))
        out += signal.oaconvolve(x * share, reflections(wet_db, early_db), axes=1)[:, :N]
    return out


def scene():
    """Wrap, snaps and box in the room, with the desk rumble and background added dry."""
    effort, flexing = squeezing() * grip()
    film = room(wrap(effort, flexing) + slides() + whistles(), wet_db=-4.5, early_db=-14.5)
    film = film + room(snaps(), wet_db=-10.5, early_db=-20.0)
    cardboard = room(box(flexing), wet_db=-9.5, early_db=-23.5, count=2)
    return film + cardboard + rumble() + background()


def record(dry):
    """The whole sound is brightened in the top octave and tilted left and right; its extremes are cut."""
    # treble colour of the whole sound: pitch_hz, level_db
    treble_colour = [(6000, 0), (7000, -.5), (8500, 1), (10000, -1), (11700, 2.5), (13500, 0), (15700, 2.5)]
    # left-right balance: pitch_hz, left_minus_right_db
    balance = [(60, 2), (130, 0.5), (250, 3), (500, 2), (1000, 2), (2000, 3), (4500, 4), (7000, 5.5),
               (9000, 0.5), (15000, 0.5)]
    hz = np.fft.rfftfreq(N, 1 / SR)
    colour_db = read(treble_colour, hz) + read(balance, hz) * np.array([[0.5], [-0.5]])
    heard = irfft(rfft(dry) * gain_of(colour_db), N)
    # deep bass and the very top are cut
    heard = signal.sosfilt(signal.butter(4, 40, "highpass", fs=SR, output="sos"), heard)
    top_cut = signal.firwin(301, 16350, window=("kaiser", 9), fs=SR)  # cutoff in Hz
    return signal.oaconvolve(heard, top_cut[None], "same")


dry = scene()
out = record(dry)
master_out(out)
```